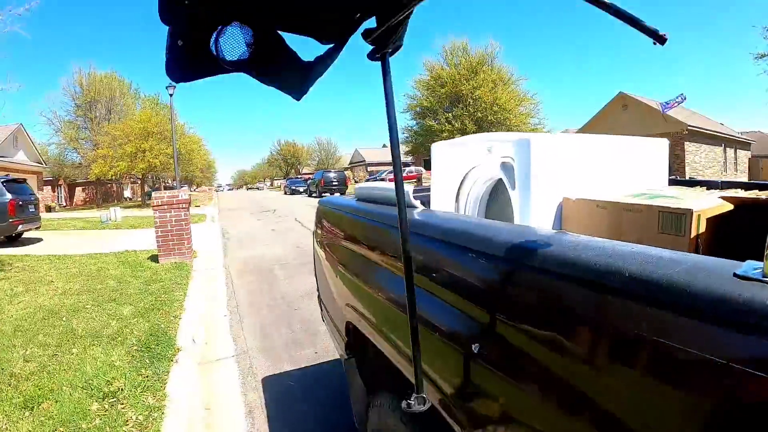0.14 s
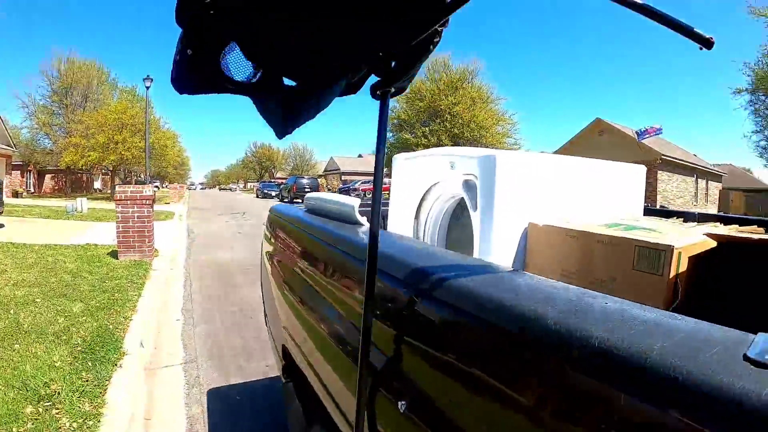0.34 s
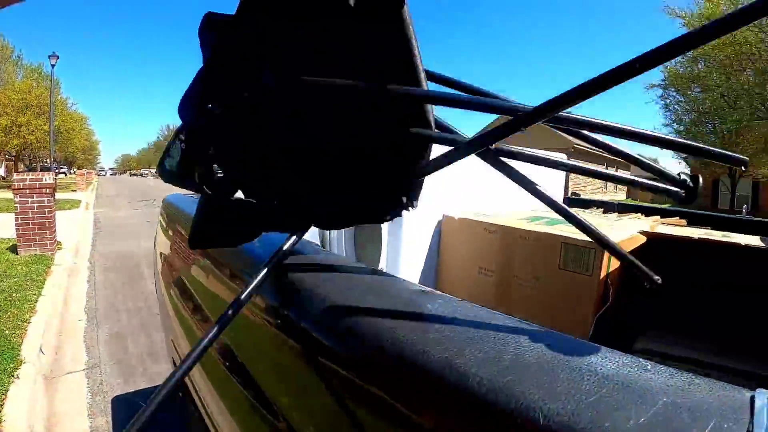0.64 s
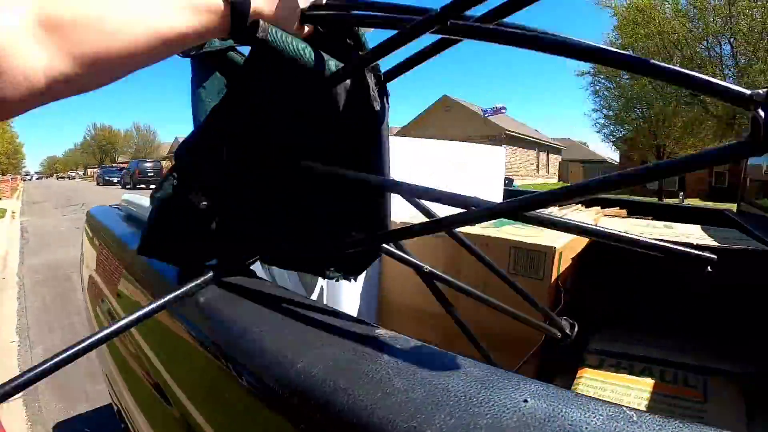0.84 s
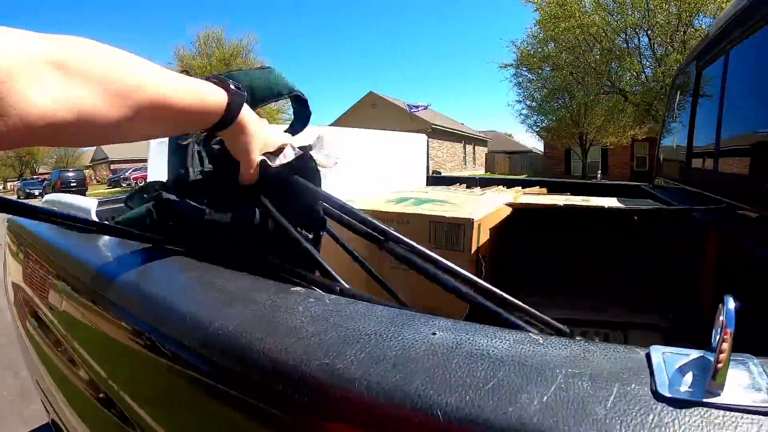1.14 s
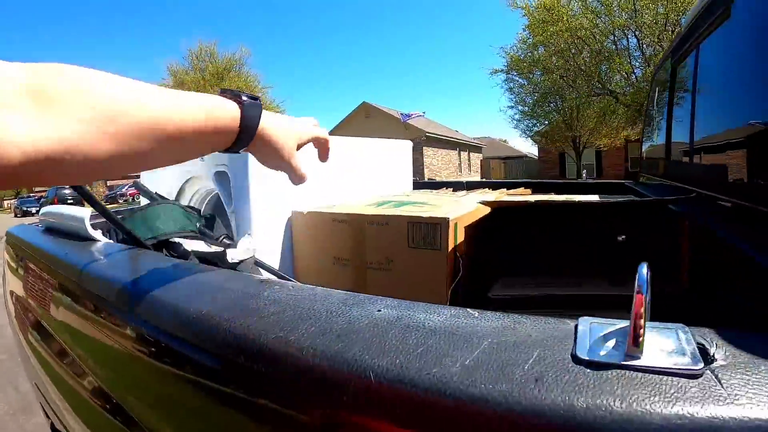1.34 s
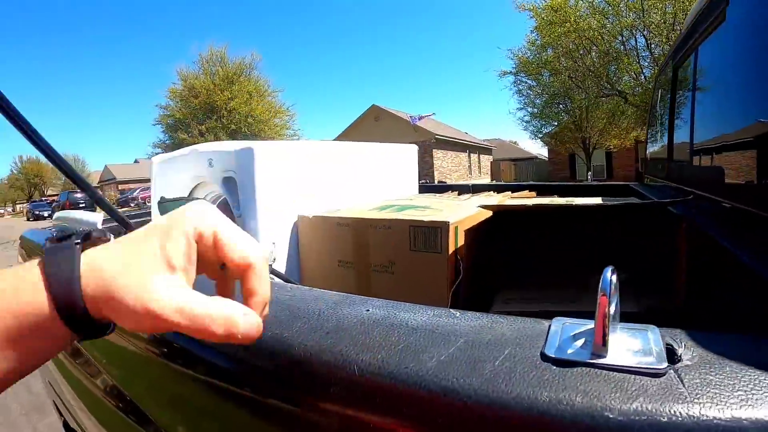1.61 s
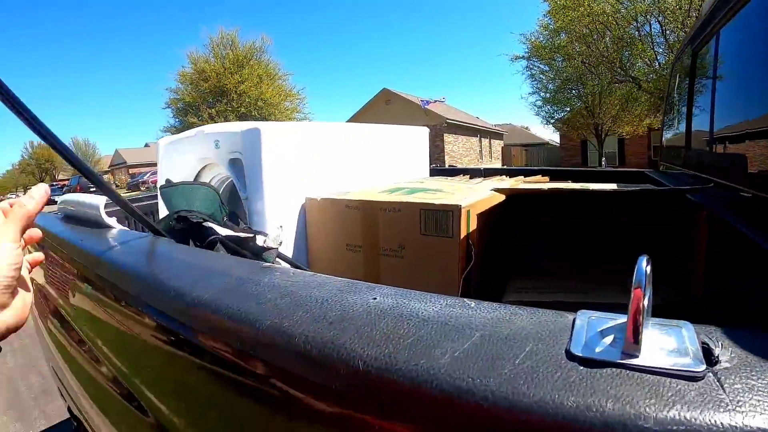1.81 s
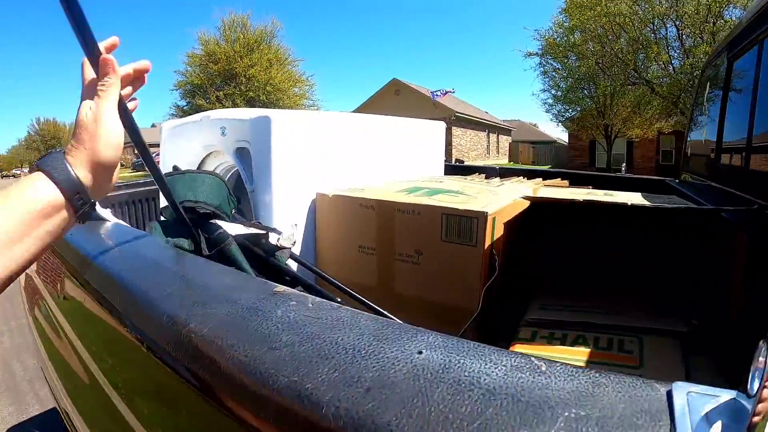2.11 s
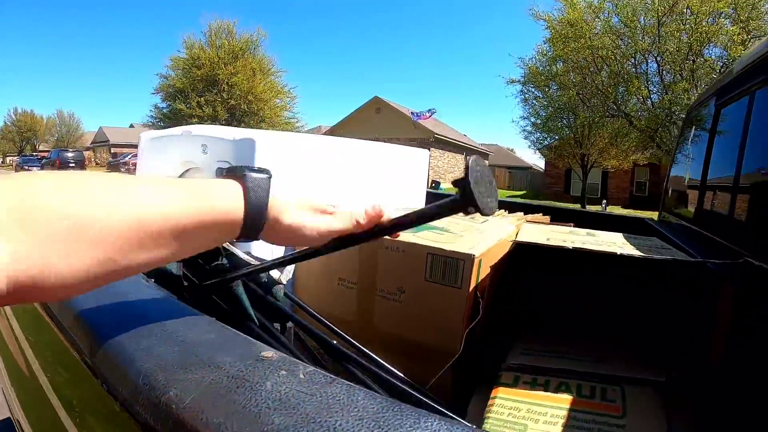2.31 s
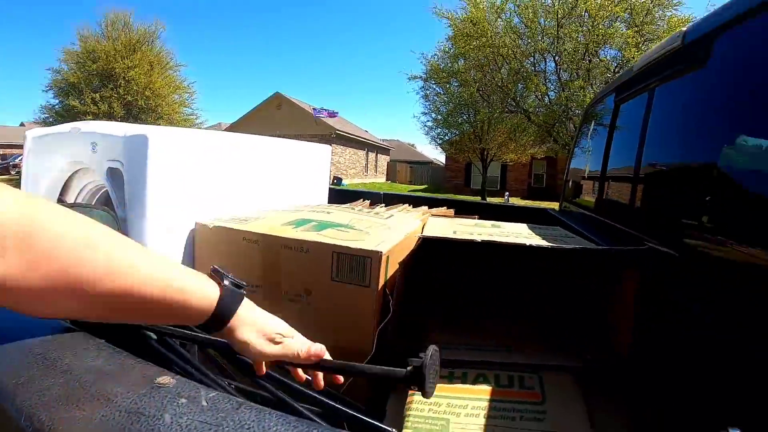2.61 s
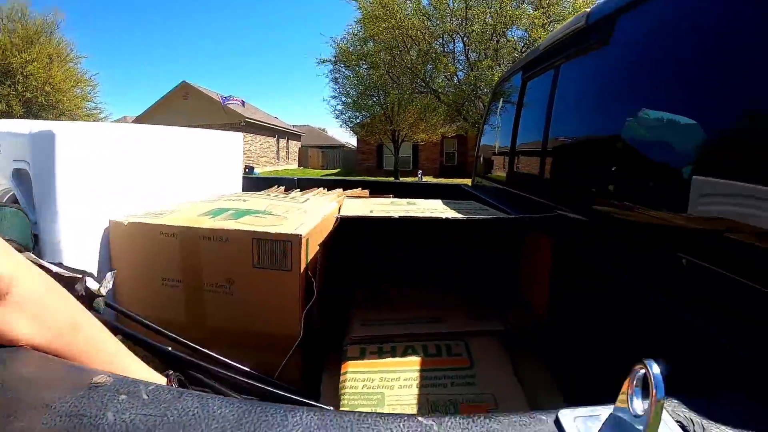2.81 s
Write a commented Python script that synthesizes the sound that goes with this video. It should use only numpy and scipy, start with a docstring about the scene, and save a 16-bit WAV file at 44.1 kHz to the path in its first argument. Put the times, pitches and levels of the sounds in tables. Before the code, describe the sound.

A folding camp chair knocks hollowly on a truck's side, then clatters into the bed with bright tube clinks and scraping; after a quiet gap it clanks again. Low engine hum beneath, close outdoor microphone, nearly mono.

```python
"""Camp chair into a pickup

A folding camp chair is lifted into a pickup beside its idling engine, heard almost in mono.
Legs bang the sheet metal (cracks, ringing modes, rattle; one ring-on drawn as a gliding sine).
Steel tubes clink and jingle (ringing modes), fabric and feet scrape (grainy noise), narrow noise whistles.
The engine is a wandering hum over noise bands, with a bed of rumble and distant hiss around it."""
import sys
import numpy as np
from scipy import signal
from scipy.io import wavfile
from scipy.ndimage import uniform_filter1d

SR = 44100
rng = np.random.default_rng(int(sys.argv[2]) if len(sys.argv) > 2 else 0)


def inscribe(sig):
    """Save sig as 16-bit PCM at rate SR to the path in sys.argv[1].

    A 1-D sig is mono; a 2-D sig holds one channel per row.
    Samples are clipped to [-1, 1] before scaling.
    """
    pcm = np.round(np.clip(np.atleast_2d(sig).T, -1, 1) * 32767)
    wavfile.write(sys.argv[1], SR, pcm.astype(np.int16))


N = 130095


def undb(db):
    """Turn decibels into an amplitude factor."""
    return 10 ** (np.asarray(db) / 20)


def unit(x):
    """Scale to an RMS of one."""
    return x / np.sqrt(np.mean(x ** 2))


def decay(t, t60):
    """Exponential fade that has fallen 60 dB after t60 seconds."""
    return np.exp(-np.log(1000) * t / t60)


def curve(table, axis):
    """Draw straight lines through one column of a table whose first column is time."""
    table = np.array(table)
    return np.interp(np.arange(N) / SR, table[:, 0], table[:, axis])


def on_log(hz, points_hz, values):
    """Interpolate values along a logarithmic frequency axis."""
    return np.interp(np.log(hz), np.log(points_hz), values)


def band(x, hz, width):
    """Band-pass of the given centre and width, its top edge kept below the Nyquist limit."""
    edges = [hz - width / 2, min(hz + width / 2, .45 * SR)]
    return signal.sosfilt(signal.butter(2, edges, "band", fs=SR, output="sos"), x)


def walk(rate):
    """Random levels held 1 / rate s and slewed twice."""
    hold = int(SR / rate)
    steps = np.repeat(rng.standard_normal(N // hold + 1), hold)
    return 1.267 * uniform_filter1d(uniform_filter1d(steps, hold), hold)[:N]


def add(out, s, x):
    """Mix x into out from s seconds on, cutting it at the end."""
    i = int(s * SR)
    out[i:i + len(x)] += x[:N - i]


def ring(t, hz, db, t60, phase):
    """Struck metal as a sum of fading sines, one per mode."""
    sines = np.sin(2 * np.pi * hz[:, None] * t + phase[:, None])
    return (undb(db)[:, None] * decay(t, t60[:, None]) * sines).sum(0)


# Engine levels over time. Each row: time in seconds, then relative levels of
# the hum, the throb and the rumble in dB.
ENGINE_LEVELS = [(0.0, -31, -15.5, -36.5), (0.18, -20.5, -22.5, -33.5), (0.29, -32.5, -30, -19),
                 (0.47, -38, -27.5, -31.5), (0.66, -28, -28, -24), (0.83, -38.5, -30, -37),
                 (1.03, -29, -25, -47.5), (1.22, -30.5, -26.5, -42.5), (1.33, -26, -22.5, -32),
                 (1.37, -40, -26.5, -49.5), (1.41, -22, -27.5, -24), (1.49, -30.5, -27, -32),
                 (1.56, -23.5, -27, -24), (1.67, -29, -25.5, -39), (1.96, -27, -23.5, -60),
                 (2.23, -24.5, -23.5, -45), (2.61, -27, -20, -34), (2.71, -31, -20, -37.5),
                 (2.81, -24.5, -22.5, -41), (2.95, -27.5, -23.5, -38)]
# Hum overtones. Each row: multiple of the hum pitch, relative level in dB.
HUM_OVERTONES = [(1, -0.5), (2, -20), (3, -27.5)]
# Throb noise bands. Each row: centre in Hz, width in Hz, relative level in dB.
THROB_BANDS = [(30, 12, -26.5), (44.11, 3.64, -3.5), (62.26, 2.795, -0.5), (53, 105.4, -13.5),
               (77.3, 35.9, -9.5)]
HUM_HZ, HUM_WANDER = 101.65, 0.00364  # mean pitch, wander as a fraction of it


def engine():
    """An exhaust hum with overtones, slightly wandering in pitch, over an unsteady low throb and a rumble."""
    phase = 2 * np.pi * np.cumsum(HUM_HZ * (1 + HUM_WANDER * walk(5.81))) / SR
    hum = 0
    for multiple, db in HUM_OVERTONES:
        hum = hum + undb(db + 1.93 * walk(11.09)) * np.sqrt(2) * np.sin(multiple * phase)
    throb = 0
    for hz, width, db in THROB_BANDS:
        # the first second is dropped so that narrow bands have built up
        throb = throb + undb(db) * unit(band(rng.standard_normal(N + SR), hz, width)[SR:])
    rumble = unit(band(rng.standard_normal(N), 174.6, 133.6))
    hum = hum * undb(curve(ENGINE_LEVELS, axis=1))
    throb = unit(throb) * undb(curve(ENGINE_LEVELS, axis=2))
    return hum + throb + rumble * undb(curve(ENGINE_LEVELS, axis=3))


# Spectrum of the background. Each row: frequency in Hz, relative density in dB per Hz.
STREET_SPECTRUM = [(76, -33), (130, 2), (231, -16.5), (305, -4.5), (337, -29), (388, -3.5), (600, -21),
                   (676, -25), (1720, -25), (15000, -69)]
STREET_DB = -38  # level of the whole bed


def street():
    """Engine rumble and distant hiss as noise in half-octave steps whose levels flicker a little."""
    out = 0
    for hz in 130 * 2 ** np.arange(0, 7, .5):
        density_db = on_log(hz, *np.array(STREET_SPECTRUM).T)
        # a wider band holds more power
        db = density_db + 10 * np.log10(hz) + 1.975 * walk(5.675)
        out = out + undb(db) * unit(band(rng.standard_normal(N), hz, hz / 3))
    return unit(out) * undb(STREET_DB)


# Scrape of fabric and feet. Each row: time in seconds, relative level in dB, tilt in dB per octave,
# resonance in Hz, relative level of the resonance in dB, level of the loose tubes jingling in dB.
SCRAPE_MOVES = [(0, -56.5, -3, 1205, 3, -84.5), (.26, -45.5, -8, 1192, -16, -91.5),
                (.46, -51, -7.5, 1104, 5.5, -93.5), (.67, -42, -7.5, 1100, -4.5, -90),
                (.82, -57.5, 0, 1005, -13.5, -95), (.87, -48, -5.5, 1141, 3.5, -95),
                (1.12, -53, -4.5, 1210, -2, -90), (1.25, -46.5, -4, 1318, -20, -62),
                (1.32, -46.5, -2, 1484, -13, -48.5), (1.39, -40.5, -5, 2000, -3.5, -44.5),
                (1.5, -46.5, 1, 2364, -6.5, -54), (1.61, -50, -4.5, 2778, -5.5, -58.5),
                (1.75, -56.5, -5, 3400, -4.5, -95.5), (2.08, -61, -7.5, 3316, 0.5, -103),
                (2.2, -64.5, -7.5, 2689, -5, -100), (2.36, -51.5, -5, 2625, -35.5, -74),
                (2.41, -45, -5, 2500, -5, -44), (2.47, -39.5, -1.5, 2506, -8.5, -46),
                (2.55, -45, -3.5, 2489, -4.5, -70), (2.65, -60, -5.5, 2480, -16, -91),
                (2.82, -50.5, -4, 2300, -18.5, -86.5), (2.95, -61, -0.5, 2340, -12, -90)]
GRAINS_PER_S, GRAIN_DB = 700, 2  # density, spread of grain sizes
LOW_HZ, BODY_HZ, DULL_HZ = 449.8, 744, 10650  # band grid base, tilt flat below, dulled above
RESONANCE_WIDTH_HZ = 254


def scrape():
    """Dense uneven grains, brighter or duller as the tilt moves, with one moving resonance."""
    size = undb(GRAIN_DB * np.minimum(rng.exponential(size=N), 2))
    grains = size * (rng.random(N) < GRAINS_PER_S / SR)
    roughness = unit(signal.lfilter([1], [1, -.985], grains))
    grit = rng.standard_normal(N) * (2.4 + roughness)
    body, tilt = 0, curve(SCRAPE_MOVES, axis=2)
    for k, hz in enumerate(LOW_HZ * 2 ** np.arange(-1, 5.5, .5)):
        dull_db = -10 * np.log10(1 + (hz / DULL_HZ) ** 6)
        db = tilt * np.log2(max(hz, BODY_HZ) / 2500) + dull_db + 2.91 * walk(15.817)
        # neighbouring bands alternate in sign
        body = body + (-1) ** k * undb(db) * unit(band(grit, hz, hz / 3))
    # low-passed grit on a gliding carrier makes the moving resonance
    carrier = np.sin(2 * np.pi * np.cumsum(curve(SCRAPE_MOVES, axis=3)) / SR)
    slow_grit = signal.lfilter(*signal.butter(2, RESONANCE_WIDTH_HZ / 2, fs=SR), grit)
    resonance = unit(slow_grit * carrier) * undb(curve(SCRAPE_MOVES, axis=4))
    return (0.3043 * body + resonance) * undb(curve(SCRAPE_MOVES, axis=1))


# Steel tube modes. Each row: frequency in Hz, relative level in dB,
# undamped t60 in seconds (each player below scales it).
TUBE_MODES = [(2150, -7, .03), (2580, -3, .035), (3120, -6, .03), (3690, -5, .04), (4330, -6, .04),
              (4900, -4, .045), (5400, -7, .04), (6300, -5, .04), (7930, -1, .09), (9780, -3, .08),
              (10200, -12, .3), (10500, -5, .09), (11650, -2, .09), (12300, -3, .07)]
JINGLE_TILT_DB = -12  # per octave, around 5 kHz
JINGLE_DAMPED, JINGLE_TAPS_PER_S = .7, 700  # factor on t60, tap density


def jingle():
    """Loose tubes keep touching: dense tiny contacts ring the tube modes as two-pole resonators."""
    taps = rng.standard_normal(N) * (rng.random(N) < JINGLE_TAPS_PER_S / SR)
    out = 0
    for hz, db, t60 in TUBE_MODES:
        radius = decay(1 / SR, t60 * JINGLE_DAMPED)
        poles = [1, -2 * radius * np.cos(2 * np.pi * hz / SR), radius * radius]
        tone = unit(signal.lfilter([1], poles, taps))
        out = out + undb(db + JINGLE_TILT_DB * np.log2(hz / 5000) + 6.3 * walk(44)) * tone
    return unit(out) * undb(curve(SCRAPE_MOVES, axis=5))


# Blows of the chair on the truck. Each row: start in seconds, relative crack peak in dB, seven relative
# levels of the blow in dB at the centres below, ring-time factor, place from 0 side wall to 1 bed.
BLOWS = [(0.2212, -4, -19, 2, -13.5, -15.5, -25, -22, -44, 0.777, 0.106),
         (0.229, -12, -14, -26, -12, -16.5, -20.5, -49.5, -54, 0.928, 0.085),
         (0.435, -9, -41, -38, -17.5, -16.5, -18, -32.5, -41.5, 0.641, 0.11),
         (0.461, -40.5, -38.5, -33.5, -38.5, -21, -43, -59.5, -72.5, 1, 0.02),
         (0.534, -26.5, -10.5, -3.5, -15.5, -19, -21.5, -29, -34.5, 0.711, 0.529),
         (0.554, -30.5, -2, -17, -39, -29, -37, -47.5, -56, 0.877, 0.665),
         (0.5855, -14.5, -11.5, -35.5, -16, -29, -29.5, -40, -44, 1, 0.305),
         (0.642, -17.5, -25.5, -16, -24.5, -27.5, -33, -28.5, -39.5, 0.504, 0.696),
         (0.702, -27.5, -3.5, -39.5, -37.5, -57, -50, -38.5, -60, 0.238, 0.627),
         (0.968, -29, -52.5, -51.5, -45.5, -42, -65, -41.5, -69.5, 1, 0.58),
         (1.219, -36, -54.5, -20, -38.5, -46, -42, -48.5, -69, 0.55, 0.74),
         (1.329, -15, -21, -10, -19.5, -23.5, -20, -29, -49.5, 0.305, 0.69),
         (1.362, -1, -8.5, -6.5, -10.5, -26.5, -17.5, -21.5, -29, 0.443, 0.896),
         (1.416, -28, -11.5, -17, -24.5, -45, -37, -38.5, -55, 0.944, 0.495),
         (1.477, -24, -16.5, -24, -23.5, -30.5, -55, -47, -48.5, 0.58, 1),
         (1.503, -31, -30, -57, -11, -19.5, -27, -39.5, -47, 0.442, 0.553),
         (1.539, -13.5, -16, -16.5, -26.5, -47.5, -45.5, -47.5, -59.5, 0.85, 0.778),
         (1.668, -50, -46, -50, -46, -47, -39, -48.5, -72, 0.556, 0.55),
         (2.458, -28, -7.5, -20, -27.5, -43.5, -61.5, -30, -49.5, 0.292, 0.6),
         (2.52, -21.5, -9.5, -51, -16.5, -23, -19.5, -18.5, -56.5, 0.313, 0.864),
         (2.541, -23, -24.5, -57, -29, -39.5, -52, -56, -59, 0.62, 0.57),
         (2.619, -20, -22, -33.5, -40.5, -46.5, -47, -70, -70, 0.67, 0.94),
         (2.783, -30.5, -13.5, -53, -27.5, -37.5, -30, -53.5, -57.5, 0.252, 0.65),
         (2.84, -29.5, -35, -25.5, -44.5, -47.5, -43.5, -58, -63, 0.57, 0.424),
         (2.911, -15.5, -43, -32.5, -17.5, -45.5, -39, -38.5, -47, 0.238, 0.47)]
# Centres of the seven blow bands [Hz].
BLOW_HZ = [128, 205, 410, 850, 1700, 3500, 7700]
# Truck modes. Each row: frequency in Hz, relative dB struck on the side wall,
# relative dB struck on the bed, t60 in seconds before the ring-time factor.
TRUCK_MODES = [(124.36, -11, 0.5, 0.397), (171.45, 6.5, -5, 0.528), (189.2, -16, 0.5, 0.688),
               (228.2, -15, 7, 0.322), (255, -1, -17, 0.722), (301.75, -10.5, -5, 0.574),
               (398.5, -2, 6.5, 0.1873), (505.2, -7.5, -2.5, 0.402), (575.8, -13.5, -7, 0.437),
               (736.2, 0, -8.5, 0.616), (801.3, 0, -4.5, 0.33), (939.8, 3.5, 7, 0.182),
               (1060, -13.5, -0.5, 0.254), (1214, -7, -0.5, 0.421)]
# Rattle after a blow. Each row: frequency in Hz, t60 in seconds before the ring-time factor.
RATTLE_FADES = [(128, 0.222), (410, 0.652), (850, 0.402), (1700, 0.22), (3500, 0.267), (7700, 0.117),
                (14000, 0.031)]
MODES_DB, SCATTER_DB, CONTACT_S = -5, 1.5, 0.002  # mode gain, spread per mode, onset time constant
RATTLE_DB, ROUGH_DB, RISE_S = -5, 1.5, 0.000667  # rattle gain, lumpiness, onset time constant
RATTLE_LOW_HZ = 1300  # the rattle thins out below this
SECOND_FADE_DB, SECOND_FADE_RATIO = -16.5, 0.733  # second part of the rattle: level, t60 ratio
CRACK_DB, CRACK_S = -14.5, 0.000562  # crack gain, time to its peak


def bangs():
    """Each blow cracks, rings the truck modes and shakes out a rattle that dies fastest in the top treble."""
    out, t = np.zeros(N), np.arange(SR // 2) / SR
    hz, wall_db, bed_db, t60 = np.array(TRUCK_MODES).T
    bands = 128 * 2 ** np.arange(0, 7, .5)
    # uneven small contacts make the rattle lumpy
    lumps = undb(ROUGH_DB * np.pad(walk(250), (0, SR), "wrap"))
    noise = np.array([unit(band(rng.standard_normal(N + SR) * lumps, f, f / 3)) for f in bands])
    crack_noise = unit(band(band(rng.standard_normal(N + SR), 1957, 1670), 3190, 6360))
    rattle_t60 = on_log(bands, *np.array(RATTLE_FADES).T)[:, None]
    thinning = np.hypot(1, RATTLE_LOW_HZ / bands)[:, None]
    chance = rng.standard_normal((len(BLOWS), 3, len(hz)))
    for (s, crack_db, *blow, ringing, place), (detune, scatter, phase) in zip(BLOWS, chance):
        ringing, place, i = max(ringing, .1), np.clip(place, 0, 1), int(s * SR)
        place_db = wall_db + place * (bed_db - wall_db)
        db = place_db + on_log(hz, BLOW_HZ, blow) + SCATTER_DB * scatter
        modes = ring(t, hz * (1 + 0.00394 * detune), db, t60 * ringing, .5 * phase)
        # the blow falls 14 dB further by 15 kHz
        band_db = on_log(bands, BLOW_HZ + [15000], blow + [blow[-1] - 14])
        gains = undb(band_db)[:, None] / thinning
        fade = decay(t, rattle_t60 * ringing)
        fades = fade + undb(SECOND_FADE_DB) * fade ** (1 / SECOND_FADE_RATIO)
        rattle = (gains * fades * noise[:, i:i + len(t)]).sum(0)
        crack = np.e * t / CRACK_S * np.exp(-t / CRACK_S) * crack_noise[i:i + len(t)]
        hit = undb(MODES_DB) * modes * (1 - np.exp(-t / CONTACT_S))
        hit = hit + undb(RATTLE_DB) * rattle * (1 - np.exp(-t / RISE_S))
        add(out, s, hit + undb(crack_db + CRACK_DB) * crack)
    return out


# Tube clinks. Each row: start in seconds, relative tick peak in dB, five relative ring levels in dB
# at the frequencies below, ring-time factor.
CLINK_HITS = [(0.4388, -35, -35.5, -49, -59, -68, -47.5, 1.5),
              (0.4928, -40, -59, -57, -58.5, -66.5, -68.5, 0.4),
              (0.6416, -36, -33.5, -57, -49, -51.5, -49.5, 1.3),
              (0.8587, -38.5, -30.5, -53.5, -64, -70, -72, 0.35),
              (0.882, -46, -32.5, -53, -62.5, -69.5, -72, 0.35),
              (1.1107, -50.5, -37.5, -46, -60.5, -63, -67, 0.76),
              (1.243, -27.5, -38, -49.5, -51, -53.5, -55.5, 0.79),
              (1.3304, -17.5, -35, -25, -30.5, -38.5, -32.5, 0.7),
              (1.3436, -27, -26, -29, -51.5, -46.5, -43, 0.82),
              (1.3597, -17, -12, -16.5, -43.5, -42, -29.5, 0.7),
              (1.371, -15.5, -36, -38.5, -45.5, -40.5, -28.5, 0.61),
              (1.3837, -22, -43, -37.5, -42.5, -45, -39, 1.2),
              (1.4096, -36.5, -28.5, -43, -56.5, -49, -51, 0.64),
              (1.4249, -39.5, -46, -34, -53.5, -42, -51.5, 0.8),
              (1.451, -28.5, -37, -29, -45, -38, -50.5, 1.1),
              (1.4837, -40.5, -49.5, -49, -51, -48.5, -39.5, 1.1),
              (1.5035, -36, -32.5, -34, -37, -43.5, -47.5, 0.7),
              (1.5144, -23, -26, -38.5, -49, -42.5, -46.5, 1.1),
              (1.545, -44.5, -46, -52, -60, -50, -52, 0.9), (1.59, -31, -40.5, -42.5, -49.5, -51.5, -44, 1),
              (2.2428, -67.5, -63.5, -44.5, -77.5, -80.5, -81.5, 0.59),
              (2.2804, -52, -52.5, -37, -69.5, -84, -87.5, 0.4),
              (2.294, -43.5, -45, -60, -64, -80, -84, 0.3), (2.3149, -38, -31.5, -58.5, -46, -69, -67, 0.4),
              (2.405, -42.5, -35, -40, -54, -60.5, -65, 0.5),
              (2.4436, -18.5, -24, -28.5, -48, -51.5, -53.5, 0.5),
              (2.4554, -32.5, -41.5, -16, -44, -43, -47.5, 0.5),
              (2.467, -15.5, -26.5, -16.5, -33, -36, -23.5, 0.51),
              (2.4954, -23, -32.5, -33.5, -48.5, -36, -36, 0.5),
              (2.553, -42, -48.5, -43, -41, -54.5, -63, 1), (2.8043, -22, -45, -29.5, -52, -51, -52, 0.66),
              (2.859, -43, -50, -51.5, -66, -57.5, -68, 1)]
# Frequencies of the five ring levels [Hz].
CLINK_RING_HZ = [3620, 5060, 8200, 10100, 12830]
TUBE_DB, TUBE_SCATTER_DB, TUBE_SPREAD = -6, 5, 0.0081  # ring gain, spread per mode, relative detune
TICK_DB, TICK_T60_S = -19, 0.0453
CHATTER_S = 0.0034  # mean spacing of the contacts


def clinks():
    """Tube on tube: a noise tick with four quick contacts, each ringing slightly different tubes."""
    out, t = np.zeros(N), np.arange(SR // 5) / SR
    hz, mode_db, t60 = np.array(TUBE_MODES).T
    # four contacts per clink, three random values per mode
    chance = rng.standard_normal((len(CLINK_HITS), 4, 3, len(hz)))
    hiss = unit(band(rng.standard_normal(N + SR), 4700, 9300))
    for (s, tick_db, *rings, ringing), contacts in zip(CLINK_HITS, chance):
        tick = hiss[int(s * SR):][:len(t)] * decay(t, TICK_T60_S)
        add(out, s, undb(tick_db + TICK_DB) * tick)
        for k, (detune, scatter, phase) in enumerate(contacts):
            # each further contact is weaker
            db = TUBE_DB + mode_db + on_log(hz, CLINK_RING_HZ, rings) + TUBE_SCATTER_DB * scatter - 3.76 * k
            tone = ring(t, hz * (1 + TUBE_SPREAD * detune), db, t60 * max(ringing, .1), phase)
            delay = CHATTER_S * k * (1 + .3 * np.tanh(phase[0]))
            add(out, s + delay, tone * np.minimum(t / 0.000397, 1))
    return out


# Truck modes ringing on after the knock. One row: start in seconds, length in seconds,
# first frequency of the glide in Hz, last frequency in Hz, relative peak level in dB.
RING_ON = (.442, .056, 980, 715, -16)


def ring_on():
    """Truck modes ringing on after the knock, the higher giving way to the lower, drawn as one gliding sine."""
    out = np.zeros(N)
    s, length, first_hz, last_hz, db = RING_ON
    n = int(length * SR)
    glide = np.sin(2 * np.pi * np.cumsum(np.geomspace(first_hz, last_hz, n)) / SR)
    add(out, s, undb(db) * np.hanning(n) * glide)
    return out


# Faint thin whistles. Each row: start in seconds, length in seconds, pitch in Hz, relative level in dB.
WHISTLE_TONES = [(1.6, .5, 2850, -61), (1.76, .12, 2330, -60), (1.97, .08, 2100, -59)]
WHISTLE_WIDTH_HZ = 70


def whistles():
    """Breathy tones: narrow bands of noise that swell and fade."""
    out = np.zeros(N)
    for s, length, hz, db in WHISTLE_TONES:
        n = int(length * SR)
        breath = unit(band(rng.standard_normal(SR), hz, WHISTLE_WIDTH_HZ))[-n:]
        add(out, s, undb(db) * np.sqrt(np.hanning(n)) * breath)
    return out


SIDE_HZ, SIDE_DB, RIGHT_DB = 10300, -3, -18  # side high-pass, its flicker, its steady lean to the right


def scene():
    """Mix all sources to the middle and let the top treble flicker between left and right."""
    mid = bangs() + clinks() + scrape() + jingle() + whistles() + ring_on() + engine() + street()
    high = signal.butter(2, SIDE_HZ, "high", fs=SR, output="sos")
    side = signal.sosfiltfilt(high, mid) * (undb(SIDE_DB) * walk(150) - undb(RIGHT_DB))
    return np.array([mid + side, mid - side])


TOP_HZ = 15100


def record(dry):
    """The recorder rounds the loudest peaks and cuts the top."""
    cut = signal.ellip(10, .2, 70, TOP_HZ, fs=SR, output="sos")
    return signal.sosfilt(cut, np.tanh(0.7867 * dry) / 0.8426)


dry = scene()
out = record(dry)
inscribe(out)
```